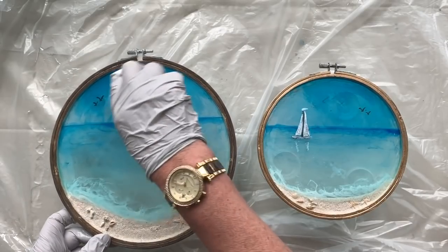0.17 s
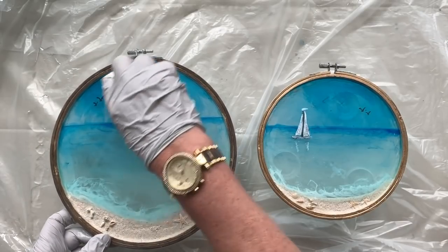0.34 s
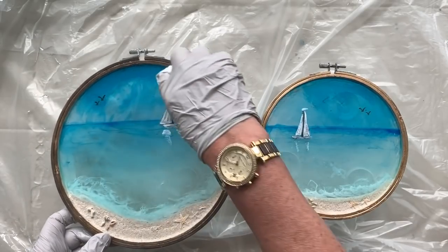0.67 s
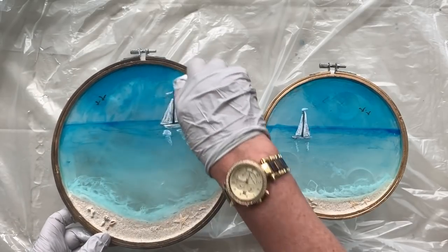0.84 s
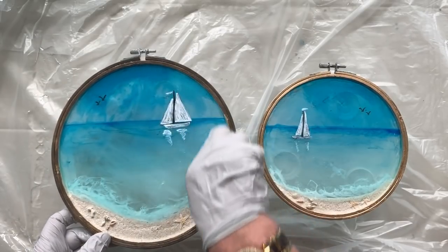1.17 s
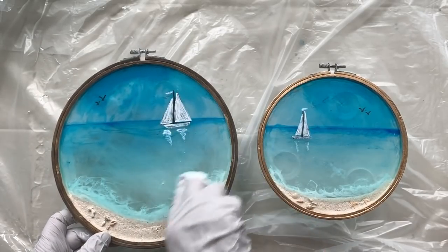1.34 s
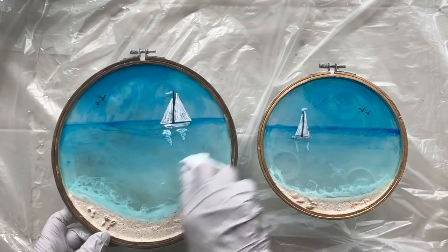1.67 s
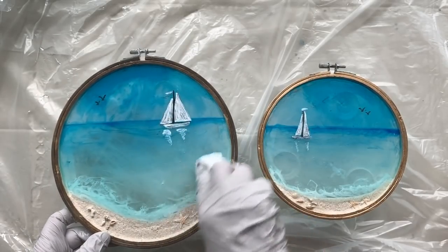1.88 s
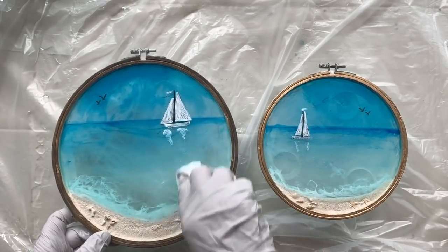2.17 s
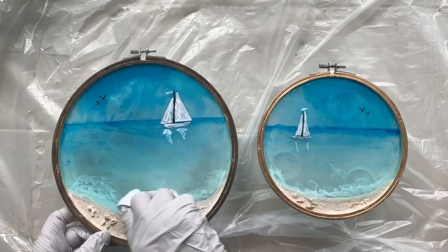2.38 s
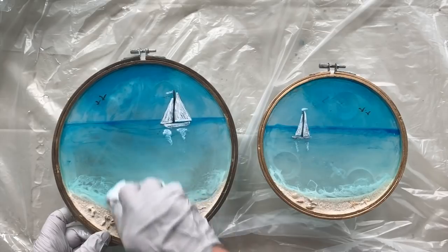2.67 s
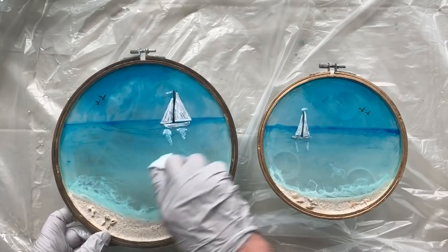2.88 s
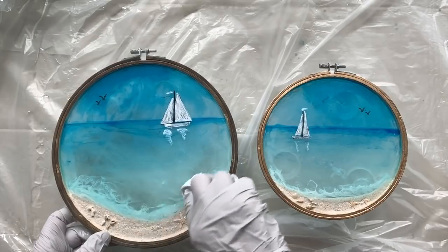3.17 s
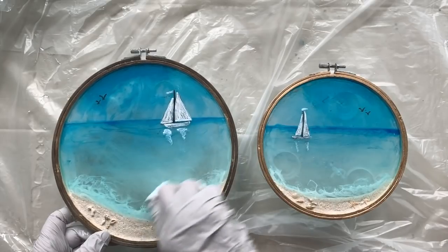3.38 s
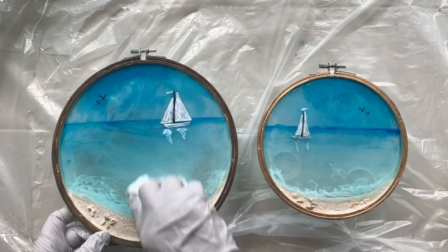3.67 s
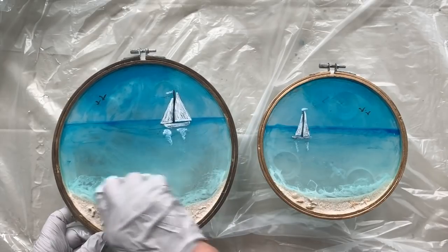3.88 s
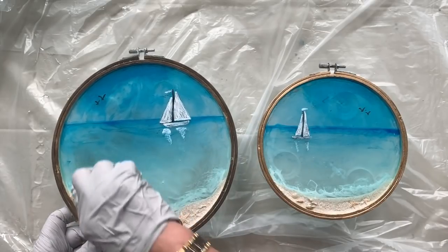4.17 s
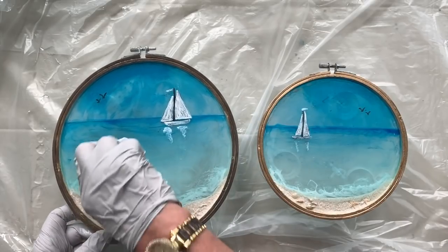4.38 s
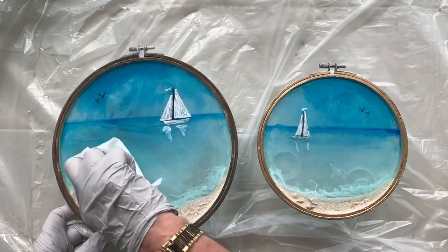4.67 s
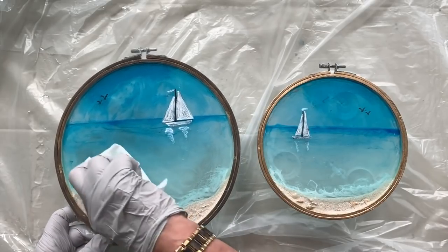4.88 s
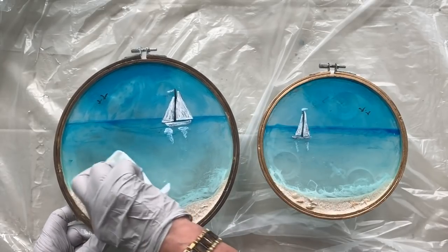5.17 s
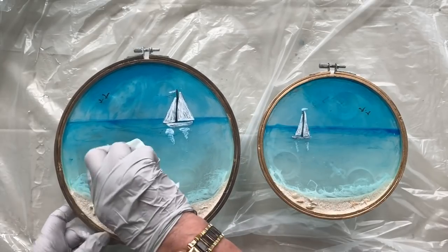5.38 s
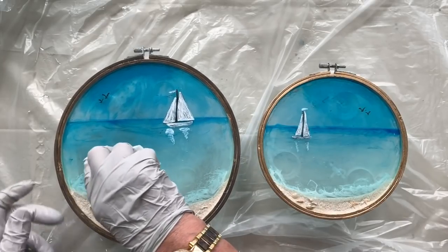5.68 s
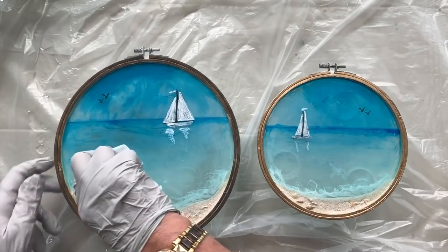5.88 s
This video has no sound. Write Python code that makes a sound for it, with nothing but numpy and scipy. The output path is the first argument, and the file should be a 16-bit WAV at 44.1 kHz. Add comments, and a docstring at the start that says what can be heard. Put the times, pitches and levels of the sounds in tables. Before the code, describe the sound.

A close stereo pickup in a small, still room with faint air noise. At 0 s light wooden taps, with a few more around 0.3 s, as a cloth starts a long rubbing sweep over a hooped resin sheet, hissing and grainy, strongest about 0.5 to 1 s and gone by 1.3 s. Thin, wavering, very high squeaks ride on it at 0.4 to 0.55 s, fainter to 0.95 s. From 1.3 to 3.9 s come short, faint brushing strokes with tiny knocks, a sharp falling chirp at 3.15 s and small squeaks at 3.5 and 3.75 s. Around 3.95 s soft thuds begin; from 4.2 to 5.3 s the hoop rocks, clacking irregularly and densely over dull table thumps, low rumble and rubbing, loudest near 4.67 and 5.04 s. Then a soft hissing wipe at 5.4 to 5.55 s, a duller rub from 5.7 s, and a light rattle at 5.95 s.

```python
"""Cloth on a hooped resin picture

A gloved hand wipes a resin picture in a wooden hoop with a cloth, on a table under plastic sheeting.
Friction noise hisses with each stroke and sounds the resin sheet; stick-slip tones squeak as the pad grips.
Pressed near its edge, the hoop rocks: its decaying modes clack and those of the table top thud.
Still air and arm rumble lie beneath; a small room and two close microphone ports shape the sound."""
import sys
import numpy as np
from scipy import signal
from scipy.fft import rfft, irfft
from scipy.io import wavfile

SR = 44100
rng = np.random.default_rng(int(sys.argv[2]) if len(sys.argv) > 2 else 0)


def to_wav(s):
    """Save 16-bit WAV."""
    ch = np.atleast_2d(s).T  # columns
    pcm = np.round(np.clip(ch, -1, 1) * 32767)  # PCM
    wavfile.write(sys.argv[1], SR, pcm.astype(np.int16))


N = 265878
TIME = np.arange(N) / SR

# weaker modes of the hoop: mode_hz, relative_db, t60_s
HOOP_MODES = [(510, -25.5, 0.045), (1105, -33, 0.011), (1225, -32.5, 0.01), (1560, -26, 0.03),
              (1705, -28.5, .022), (1955, -25, 0.012), (2380, -29, 0.019), (3950, -41, .01),
              (5690, -34.5, 0.016)]
# taps of the rim as the hoop rocks: start_s, main_note_relative_db, weaker_modes_relative_db
RIM_TAPS = [(.003, -27.5, -14), (.012, -28.5, 0), (0.2783, -24, -11), (0.285, -23, -13), (.2945, -25, -11),
            (0.318, -25.5, -16), (.5552, -34, -3), (1.8321, -31.5, -12), (1.8358, -41, -3),
            (2.1208, -45, 19), (2.783, -49, -1), (3.0788, -47, 5), (3.085, -47, -5), (3.228, -46, -5),
            (3.3391, -33.5, 11), (3.3602, -33.5, 10), (3.7925, -44, 11), (3.812, -39.5, 5),
            (3.9351, -23.5, -8), (3.953, -22.5, -6), (3.989, -36.5, -6), (4.03, -37, 0), (4.2032, -30, -2),
            (4.234, -15.5, -22), (4.248, -22, 8), (4.268, -29, 1.5), (4.273, -24, 9), (4.2826, -10.5, -22),
            (4.3083, -20, -12), (4.3143, -20, -20), (4.354, -24.5, 6.5), (4.368, -26.5, 0.5),
            (4.3857, -22, 0.5), (4.4008, -22, -3), (4.416, -19.5, -7), (4.438, -16.5, -1),
            (4.4435, -19, -4), (4.4495, -21.5, 5), (4.481, -28, 0), (4.5005, -27.5, -6),
            (4.513, -19.5, -13), (4.5369, -12, -8), (4.5445, -18, 7), (4.589, -18.5, 8.5),
            (4.6023, -11, -2.5), (4.6083, -16, -7), (4.6669, -3.5, -5), (4.67, -8, 7.5), (4.7003, -17, 1.5),
            (4.7115, -21, -11), (4.7744, -20, 0), (4.7875, -21.5, -1.5), (4.8185, -25, -3.5),
            (4.835, -21.5, 1.5), (4.845, -26.5, -6), (4.899, -16.5, -6.5), (4.903, -18, -4.5),
            (4.933, -11, -10.5), (4.94, -16, -3.5), (4.955, -30, 0.5), (4.9752, -8, -2.5), (4.98, -16, 4.5),
            (4.99, -26.5, 1), (5.0373, -3.5, 2), (5.0397, -11.5, 0.5), (5.049, -27.5, 2),
            (5.079, -22.5, -7.5), (5.0863, -11, 5), (5.104, -38.5, 8), (5.121, -27, 2), (5.2268, -15, -22),
            (5.2445, -19, 3), (5.279, -29, -3), (5.9508, -25.5, 11), (5.9563, -29, -7), (5.9772, -23.5, -3),
            (5.99, -24, 0)]
# the hoop's weight comes down on the table: start_s, low_thud_relative_db, wooden_knock_relative_db
HOOP_LANDINGS = [(.0034, -36.5, -44.5), (0.298, -30, -40), (0.3357, -26, -35.5), (0.5681, -35, -38),
                 (1.113, -48, -53), (1.23, -44.5, -55.5), (1.401, -47, -78), (1.8322, -36, -39),
                 (1.857, -43, -39.5), (2.1276, -42, -45.5), (2.7914, -45, -47.5), (2.814, -44, -62),
                 (3.0802, -40.5, -42), (3.111, -50, -54), (3.1865, -40.5, -58), (3.2295, -40, -39.5),
                 (3.258, -47, -47), (3.3497, -33, -35), (3.364, -37, -59), (3.555, -44.5, -54),
                 (3.7774, -38.5, -41.5), (3.816, -40.5, -32.5), (3.9554, -24, -39), (4.052, -21.5, -50),
                 (4.2535, -21, -27), (4.288, -21.5, -27), (4.3608, -18.5, -27), (4.4298, -23, -44),
                 (4.46, -25.5, -29.5), (4.548, -17.5, -22.5), (4.6058, -19, -25), (4.6801, -12.5, -17),
                 (4.784, -31.5, -48.5), (4.861, -24.5, -47.5), (4.9384, -16, -17.5), (4.9799, -14, -19.5),
                 (5.0402, -14, -28), (5.089, -24.5, -22.5), (5.2252, -23.5, -23), (5.2478, -15, -32),
                 (5.2779, -27, -40), (5.9566, -30.5, -27), (5.9898, -30, -26.5)]


def from_db(db):
    """Decibels to amplitude: 20 dB is a factor of ten."""
    return 10 ** (np.asarray(db) / 20)


def rms_one(x):
    """Normalisation to unit mean power."""
    return x / np.sqrt(np.mean(x ** 2) + 1e-20)


def in_time(rows):
    """Linear interpolation of each column of a curve at every sample."""
    s, *columns = np.transpose(rows)
    return [np.interp(TIME, s, column) for column in columns]


def coloured(x, colour):
    """Spectral shaping: weights each frequency by a smooth curve, then normalises to rms 1."""
    hz, db = np.transpose(colour)
    bins = np.maximum(np.fft.rfftfreq(N, 1 / SR), 1)
    gain_db = np.interp(np.log(bins), np.log(hz), db, left=-80, right=-80)
    return rms_one(irfft(rfft(x) * from_db(gain_db), N))


def drift(rate):
    """Slow random modulation: chance values, rate per second, joined by lines; rms 1."""
    knots = rng.standard_normal(int(rate * N / SR) + 2)
    return rms_one(np.interp(TIME * rate, np.arange(len(knots)), knots))


def low_pass(x, hz):
    """Gentle two-pole attenuation above a corner frequency."""
    return signal.sosfilt(signal.butter(2, hz, fs=SR, output="sos"), x + 1e-18)


def high_pass(x, hz):
    """Gentle two-pole attenuation below a corner frequency."""
    return signal.sosfilt(signal.butter(2, hz, "high", fs=SR, output="sos"), x + 1e-18)


def resonance(x, hz, width_hz):
    """Second-order resonance: a band of gain 1 at its centre."""
    return signal.lfilter(*signal.iirpeak(hz, hz / width_hz, fs=SR), x)


def steep_resonance(x, hz, width_hz):
    """Cascaded resonance: the same band applied twice leaves dark valleys on both sides."""
    return resonance(resonance(x, hz, width_hz), hz, width_hz)


def ring(x, hz, t60):
    """Free vibration of a damped mode: a unit click starts a sine that decays 60 dB in t60 seconds."""
    decay = from_db(-60 / (t60 * SR))   # per sample
    angle = 2 * np.pi * hz / SR
    return signal.lfilter([0, np.sin(angle)], [1, -2 * decay * np.cos(angle), decay * decay], x + 1e-18)


def clicks(times, heights):
    """Impulsive excitation: one click per event."""
    at = np.clip(np.round(times * SR).astype(int), 0, N - 1)
    return np.bincount(at, heights, N)


def friction(grain_db):
    """Friction noise: countless fibres catch and let go, each with a force of its own."""
    return rng.standard_normal(N) * from_db(grain_db * drift(900))


def gesture(start, end, attack_s, release_s):
    """Smooth envelope of one hand movement: attack, hold and release."""
    attack = (1 + np.tanh((TIME - start) / (2 * attack_s))) / 2
    release = (1 + np.tanh((end - TIME) / (2 * release_s))) / 2
    return attack * release


def still_air():
    """Diffuse background noise: independent at the two ports."""
    # noise of the still room: frequency_hz, relative_db_per_hz
    air_colour = [(25, -3.5), (70, -2), (150, -2), (300, -10), (700, -23), (2000, -19.5), (5000, -53),
                  (16000, -69.5)]
    return from_db(-61.0) * np.array([coloured(rng.standard_normal(N), air_colour) for channel in range(2)])


def room(x, t60=0.25, wall_hz=9000, first_s=0.0055, alike_below_hz=900):
    """Reverberation: dense decaying reflections, shared by the ports in the bass, different above it."""
    age = np.arange(SR // 2) / SR
    shared, own = rng.standard_normal(len(age)), rng.standard_normal((2, len(age)))
    tails = low_pass(shared, alike_below_hz) + high_pass(own, alike_below_hz)
    tails = low_pass(tails, wall_hz) * from_db(-60 * age / t60) * (age > first_s)
    tails = tails / np.sqrt(np.sum(tails ** 2, axis=1, keepdims=True))   # unit energy at each port
    return signal.fftconvolve(x[None], tails, axes=1)[:, :N]


def ports(x, right_db):
    """Interaural-style cues: direct sound reaches the two ports a little apart in level and phase."""
    # phase by which the left port leads: frequency_hz, lead_rad
    left_lead = [(0, 0), (1200, .6), (3000, 1.5), (5000, 3.1), (7100, 6.3), (9800, 9.4), (12600, 12.6),
                 (15200, 15.7)]
    lead = np.interp(np.fft.rfftfreq(N, 1 / SR), *np.transpose(left_lead))
    side = np.array([[-1], [1]]) / 2   # left, right
    return irfft(rfft(x) * np.exp(-1j * side * lead), N) * from_db(side * right_db)


def arm_rumble():
    """Structure-borne noise: the moving arm shakes the table."""
    # course of the shaking: time_s, relative_db
    shaking = [(0.0, -61.5), (0.6, -55.5), (0.77, -59.5), (2.84, -67.5), (3.93, -58.5), (4.35, -50.5),
               (4.47, -39), (5.15, -42.5), (5.33, -46), (5.56, -67.5), (6.03, -59.5)]
    # spectrum: frequency_hz, relative_db_per_hz
    shaking_colour = [(20, -47.5), (35, -4.5), (55, 9.5), (72, 6), (105, 2), (150, -9.5), (260, -20),
                      (450, -46.5), (900, -73.5)]
    return from_db(in_time(shaking)[0] + 10) * coloured(rng.standard_normal(N), shaking_colour)


def settling():
    """Damped shifting noise: after each landing the hoop moves on the sheeting and the top rumbles briefly."""
    # spectrum: frequency_hz, relative_db_per_hz
    settle_colour = [(120, -18.5), (180, 1.5), (280, 4), (380, -8.5), (520, -22.5), (900, -33)]
    level_db, follows, peak_s = -28.5, 0.67, 0.011   # under a 0 dB thud; share of the thud's swing; time to peak
    force = 0
    for s, thud_db, knock_db in HOOP_LANDINGS:
        age = np.maximum(TIME - s, 0) / peak_s
        force = force + from_db(follows * thud_db) * age * np.exp(1 - age)
    return from_db(level_db) * force * coloured(friction(grain_db=2.5), settle_colour)


def table(contact_hz=700, knock_above_hz=150, build_up_q=2.5):
    """Modal excitation by cushioned blows: weight drives the low modes, hardness the upper ones."""
    # modes of the table top: mode_hz, relative_db, t60_s
    table_modes = [(60, -12, .18), (72, -11, .14), (103, 1, .23), (121, -9, .16), (172, -5, .18),
                   (222, -9, .1), (251, -6, .13), (334, -7, .1), (420, -9, .06), (496, -9, .08),
                   (642, -9, .06)]
    # at first the hand presses the hoop's far edge, which drives one mode harder
    far_edge_until_s, far_edge_mode_hz, far_edge_db = .45, 172, 12
    times, thud_db, knock_db = np.transpose(HOOP_LANDINGS)
    chance_db = rng.normal(0, 1.2, (len(times), len(table_modes)))
    # the spot that is struck decides the sign of each upper mode
    spot = rng.choice([-1, 1], (len(times), len(table_modes)))
    out = 0
    for k, (hz, mode_db, t60) in enumerate(table_modes):
        if hz > knock_above_hz:
            blow = spot[:, k] * from_db(knock_db - 1.0)
        else:
            blow = (-1) ** k * from_db(thud_db)
        edge_db = far_edge_db * (hz == far_edge_mode_hz) * (times < far_edge_until_s)
        mode = ring(clicks(times, blow * from_db(mode_db + edge_db + chance_db[:, k])), hz, t60)
        # each mode takes a few cycles to build up, so the lowest come last
        out = out + resonance(mode, hz, hz / build_up_q)
    return low_pass(out, contact_hz)


def singing():
    """Friction-driven resonance: dragged hard along the edge, the pad makes the rim sing in fits and starts."""
    # course of the faint note: time_s, level_db
    song = [(4.11, -80), (4.14, -58), (4.22, -57), (4.36, -52), (4.64, -53), (4.75, -63), (4.8, -85)]
    dragging = (TIME > song[0][0]) & (TIME < song[-1][0])
    note = steep_resonance(friction(grain_db=1.5), hz=1390, width_hz=270)
    note = note * from_db(5 * drift(35))   # breaks in the note: spread in dB, changes per second
    return dragging * from_db(in_time(song)[0]) * rms_one(note)


def grinding(follows=0.77, lag_s=0.002):
    """Sliding friction: as the hoop rocks, the rim drags a little on the crumpled sheeting."""
    # spectrum: frequency_hz, relative_db_per_hz
    grind_colour = [(150, -8.5), (300, 0.5), (550, 3.5), (900, -4.5), (1300, -3), (1700, -11.5),
                    (2200, -22), (3500, -28.5)]
    level_db, rise_s, decay_s = -24, 0.0053, 0.013   # for a 0 dB tap; time constants of swelling and dying
    power = 0
    for s, db, modes_db in RIM_TAPS:
        age = TIME - s - lag_s
        swell = np.exp(np.minimum(age / rise_s, -age / decay_s))
        power = power + (from_db(follows * db) * swell) ** 2
    return from_db(level_db) * np.sqrt(power) * coloured(friction(grain_db=3.0), grind_colour)


def tremors(per_s=120, note_hz=930, note_t60=0.019):
    """Random impacts on a modal body: under the pressing hand the hoop chatters in many tiny touches."""
    # spells of faint chatter: start_s, end_s, typical_touch_relative_db
    chatter = [(4.247, 5.263, -39), (5.951, 6.044, -35)]
    pressing = sum(from_db(db) * gesture(start, end, attack_s=0.0032, release_s=.009)
                   for start, end, db in chatter)
    size_db = 3.5 * rng.standard_normal(N)
    touches = (rng.random(N) < per_s / SR) * pressing * from_db(size_db)
    modes = sum((-1) ** k * ring(touches * from_db(db + 11), hz, t60)
                for k, (hz, db, t60) in enumerate(HOOP_MODES))
    return low_pass(ring(touches, note_hz, note_t60) + modes, 1300)


def hoop(swell_s=0.0013):
    """Impact on a modal body: a short main note, lower for softer taps, above a set of weaker modes."""
    times, db, modes_db = np.transpose(RIM_TAPS)
    # main note at 0 dB and its rise per dB; the scatter follows the spot that is struck
    note_hz = 955 + 4 * db + 55 * rng.standard_normal(len(db))
    notes, age = np.zeros(N + SR), np.arange(SR // 40) / SR
    envelope = age / swell_s * np.exp(1 - age / swell_s)
    for s, height, hz in zip(times, from_db(db), note_hz):
        at = max(round(s * SR), 0)
        notes[at:at + len(age)] += height * envelope * np.sin(2 * np.pi * hz * age)
    chance_db = rng.normal(0, 2.5, (len(times), len(HOOP_MODES)))
    modes = 0
    for k, (hz, mode_db, t60) in enumerate(HOOP_MODES):
        blows = clicks(times, from_db(db + modes_db + mode_db + chance_db[:, k]))
        modes = modes + (-1) ** k * ring(blows, hz, t60)
    return from_db(-2.5) * notes[:N] + low_pass(modes, 7300)


def chirp(s, length, first_hz, last_hz, db):
    """Frequency glide of one brief grip: it swells and fades while its pitch moves."""
    share, edge_db = 0.48, 3.5   # where in its length it is loudest; how much weaker its ends are
    peak = (s + share * length, first_hz + share * (last_hz - first_hz), db)
    return [(s, first_hz, db - edge_db), peak, (s + length, last_hz, db - edge_db)]


def squeaks(overtone_db=1.5, flutter_db=2.0, edge_s=0.00041):
    """Stick-slip oscillation: the pad grips and slips at an unsteady rate, with two overtones."""
    # one curve for each squeal: time_s, slips_per_s, relative_db
    squeals = [
        [(.362, 6700, -45), (.372, 5040, -36), (.378, 6000, -33.5), (.383, 6800, -30), (.39, 6800, -31),
         (.395, 8200, -25.5), (.41, 8100, -23), (.427, 7850, -27.5), (.434, 7600, -28), (.444, 8200, -22),
         (.449, 7000, -33), (.4545, 5600, -29), (.46, 6000, -30), (.467, 7900, -33), (.475, 8800, -25),
         (.486, 7900, -29), (.498, 7900, -29.5), (.509, 8800, -24), (.52, 7800, -26), (.532, 7800, -39),
         (.547, 7100, -42)],
        [(.63, 4450, -48), (.642, 4100, -39), (.659, 3930, -37.5), (.668, 4280, -39), (.682, 4350, -37.5),
         (.696, 4550, -47)],
        [(3.142, 13000, -61), (3.15, 11000, -22), (3.156, 9500, -27), (3.16, 6900, -33), (3.162, 3700, -38.5),
         (3.166, 3120, -51.5)],
        [(3.482, 11600, -50), (3.489, 10400, -34), (3.494, 9700, -31), (3.499, 8550, -33.5), (3.505, 9400, -51),
         (3.55, 10500, -67)],
    ]
    # brief grips with a glide: start_s, length_s, first_hz, last_hz, relative_db
    grips = [(0.82, 0.024, 8100, 8230, -42), (0.908, 0.042, 9500, 9260, -36),
             (1.948, 0.031, 818, 759, -56.5), (3.173, 0.025, 400, 400, -46),
             (3.762, 0.0062, 12600, 10450, -30), (4.502, 0.0077, 9900, 4700, -43),
             (5.678, 0.0051, 8570, 6400, -43)]
    # how well each pitch radiates: frequency_hz, gain_db
    radiation = [(400, -5), (800, -2), (1200, -22), (3000, 4), (4200, -2.5), (5500, -0.5), (8000, -4.5),
                 (11500, -2.5), (14000, -21), (15000, -17), (15700, -16)]
    waver = 1 + .009 * drift(2200)   # unsteadiness as a share of the slip rate
    out, flutter = np.zeros(N), flutter_db * drift(250)
    for rows in squeals + [chirp(*row) for row in grips]:
        start, end = rows[0][0], rows[-1][0]
        gripping = (TIME > start) & (TIME < end)
        hz, db = (column[gripping] for column in in_time(rows))
        phase = 2 * np.pi * np.cumsum(hz * waver[gripping]) / SR
        # each squeal takes edge_s to catch and to let go
        edges = np.minimum(np.minimum(TIME[gripping] - start, end - TIME[gripping]) / edge_s, 1)
        for k in range(1, 4):
            radiated_db = np.interp(k * hz, *np.transpose(radiation))
            level = db + flutter[gripping] + overtone_db * (k - 1) + radiated_db
            out[gripping] += edges * from_db(level + 4.0) * (k * hz < SR / 2) * np.sin(k * phase)
    return out


def scuffs():
    """Transient friction: short bursts of noise as a fold slips over the rim."""
    # slips of the fold: centre_s, relative_db, length_s
    slips = [(1.974, -60.5, 0.022), (2.04, -60.5, 0.0048), (2.13, -71, 0.0032), (2.424, -71.5, .016),
             (2.742, -68, 0.013), (3.057, -71.5, 0.023), (3.168, -66, 0.0028), (3.175, -62, 0.0009),
             (3.183, -69, .011), (3.339, -56.5, 0.0026), (3.355, -66.5, 0.0058), (3.467, -65.5, .008),
             (4.202, -51, 0.0019), (4.273, -49.5, 0.0036), (4.345, -60, .006), (4.419, -52, 0.005),
             (4.596, -55, 0.0036), (4.673, -53.5, 0.0049), (4.771, -47, 0.0077), (4.833, -46, 0.0066),
             (5.035, -56.5, 0.0022)]
    # spectrum: frequency_hz, relative_db_per_hz
    slip_colour = [(400, 4), (900, 0), (1800, 6.5), (3000, -3), (4200, 7.5), (8000, -2.5), (12000, -2.5),
                   (16000, -22.5)]
    force = sum(from_db(db) * np.exp(-np.abs((TIME - s) / length) ** 2.3) for s, db, length in slips)
    return from_db(12.0) * force * coloured(friction(grain_db=-1.0), slip_colour)


def wiping():
    """Power addition of movements: strokes and one long sweep over a faint creep, for rubbing and hiss."""
    # short strokes of the cloth: start_s, end_s, rubbing_relative_db, fibre_hiss_relative_db
    strokes = [(-.04, 0.006, -53, -56), (0.134, 0.236, -73.5, -67), (1.33, 1.494, -70.5, -67.5),
               (1.588, 1.734, -64.5, -59.5), (1.78, 1.825, -61.5, -67), (1.889, 2.003, -61, -55.5),
               (2.002, 2.22, -70.5, -69.5), (2.31, 2.47, -84, -62.5), (2.616, 2.783, -81, -61.5),
               (2.93, 3.123, -81, -67), (3.133, 3.224, -75, -61), (3.445, 3.493, -79, -64.5),
               (3.725, 3.892, -83, -64), (4.031, 4.074, -53.5, -61), (4.19, 5.218, -56.5, -69.5),
               (4.82, 4.944, -79, -63), (5.17, 5.251, -53.5, -59.5), (5.374, 5.555, -52, -48.5),
               (5.711, 5.96, -63, -81), (5.972, 6.017, -50, -53.5)]
    # one long sweep round the rim: time_s, rubbing_relative_db, fibre_hiss_relative_db
    sweep = [(.24, -77, -65.5), (.36, -56, -55), (.46, -56, -49), (.56, -51.5, -55), (.67, -46, -50),
             (.79, -47.5, -49), (.93, -48.5, -49.5), (1.07, -59, -55.5), (1.2, -57, -50),
             (1.26, -68, -56.5), (1.31, -102, -81)]
    attack_s, release_s = 0.0045, 0.0048   # time constants of the hand speeding up and slowing down
    arch_db = 5   # the hand is fastest in mid-stroke: this much louder than at the ends
    sweeping = (TIME > sweep[0][0]) & (TIME < sweep[-1][0])
    creep = from_db([[-89], [-71]])   # the cloth never quite rests: rubbing, hiss
    power = creep ** 2 + sweeping * from_db(in_time(sweep)) ** 2
    # in strokes the pad catches and runs on unevenly; the fibres' hiss follows half as much in dB
    catching = from_db(2.5 * drift(70) * np.array([[1], [1 / 2]]))
    for start, end, rub_db, hiss_db in strokes:
        off_centre = np.clip((2 * TIME - start - end) / (end - start), -1, 1)
        arch = from_db(arch_db * (1 / 3 - off_centre ** 2))
        speed = arch * gesture(start, end, attack_s, release_s)
        power = power + (catching * from_db([[rub_db], [hiss_db]]) * speed) ** 2
    return np.sqrt(power)


def cloth(unsteady_db=1.5, shifting_db=3.5, shifts_per_s=22, direct_db=-3):
    """Friction noise through shifting plate resonances: the pad's rubbing, and the finer hiss of its fibres."""
    # spectra of rubbing and hiss: frequency_hz, relative_db_per_hz
    rub_colour = [(250, 5.5), (450, -1.5), (900, 0), (1800, -1.5), (3000, 1), (4500, -4.5), (6500, 0),
                  (10000, -41)]
    hiss_colour = [(2500, -11.5), (4500, -0.5), (6000, -1.5), (8300, -0.5), (10000, -8.5), (11500, 1.5),
                   (13500, -8.5), (16000, -17)]
    # resonances of the resin sheet under the pad: centre_hz, width_of_each_pass_hz, relative_db
    sheet_modes = [(570, 110, -3), (850, 190, 8), (1130, 170, 7), (1300, 190, 6), (1740, 340, 11),
                   (2130, 170, 5), (2460, 140, 0), (2770, 240, 7), (3390, 340, 6), (4000, 340, 8.5),
                   (4320, 420, 7), (5450, 350, 1)]
    # level of the rubbing's treble resonances, highest early in the sweep: time_s, relative_db
    rub_treble = [(.3, -5.5), (.4, 0.5), (.56, 4.5), (.68, 0.5), (.84, -9), (1.0, -6.5), (1.2, 1),
                  (1.35, -5.5)]
    treble_above_hz = 2500
    rub, hiss = wiping() * from_db(unsteady_db * drift(40))
    drag, treble_db = friction(grain_db=3.5), in_time(rub_treble)[0]
    sheet = from_db(direct_db) * drag
    for hz, width_hz, db in sheet_modes:
        # each resonance shifts in level as the pad travels
        mode_db = db + shifting_db * drift(shifts_per_s) + treble_db * (hz > treble_above_hz)
        sheet = sheet + from_db(mode_db) * steep_resonance(drag, hz, width_hz)
    rubbing = from_db(2.0) * rub * coloured(sheet, rub_colour)
    hissing = from_db(3.0) * hiss * coloured(friction(grain_db=1.5), hiss_colour)
    return rubbing, hissing


def scene():
    """Superposition of direct sound, reverberation and background."""
    rub, hiss = cloth()
    fine_friction, squeal = hiss + scuffs(), squeaks()
    clack = hoop() + tremors() + grinding() + singing()
    thud = table() + settling()
    direct = ports(fine_friction + squeal, right_db=0.9)
    direct = direct + ports(rub + arm_rumble(), right_db=2.5) + ports(clack + thud, right_db=3.0)
    to_room = from_db(-7.5) * rub + from_db(-12.0) * fine_friction
    to_room = to_room + from_db(-13.5) * high_pass(squeal, 1800) + from_db(-15.0) * clack
    boom = room(from_db(-9.0) * high_pass(thud, 270), t60=0.41, alike_below_hz=210)
    return direct + room(to_room) + boom + still_air()


def record(dry):
    """Band limitation: the deepest bass is cut gently and the top steeply."""
    dry = signal.sosfilt(signal.butter(2, 36, "high", fs=SR, output="sos"), dry)
    return signal.sosfilt(signal.ellip(10, .1, 80, 15900, fs=SR, output="sos"), dry)


dry = scene()
out = record(dry)
to_wav(out)
```